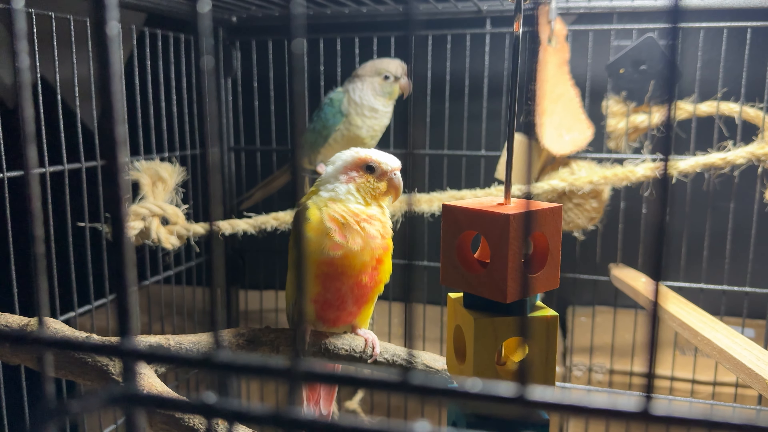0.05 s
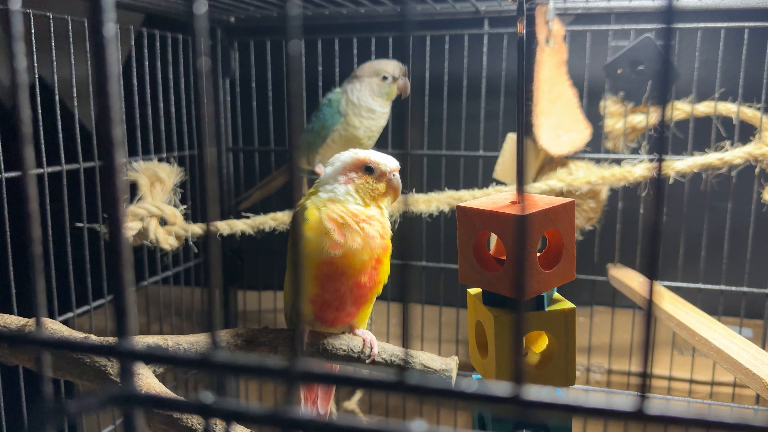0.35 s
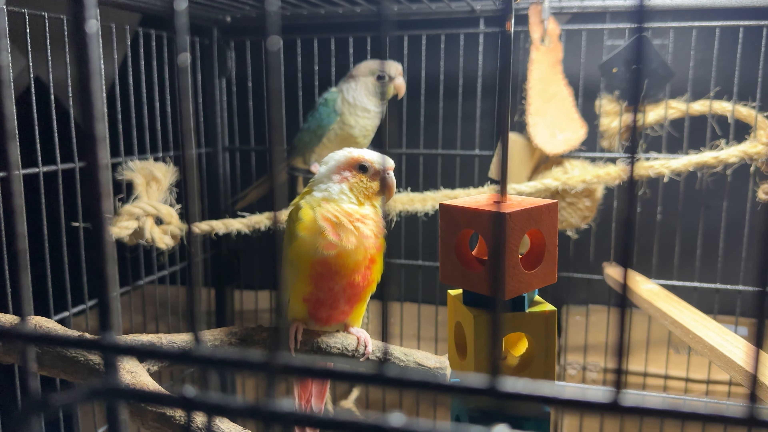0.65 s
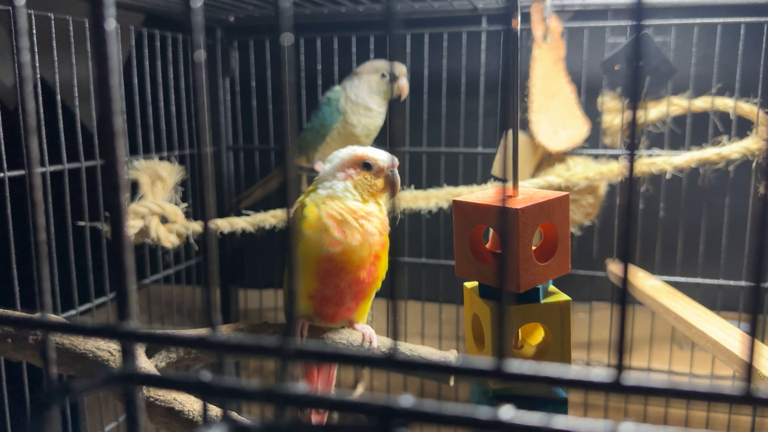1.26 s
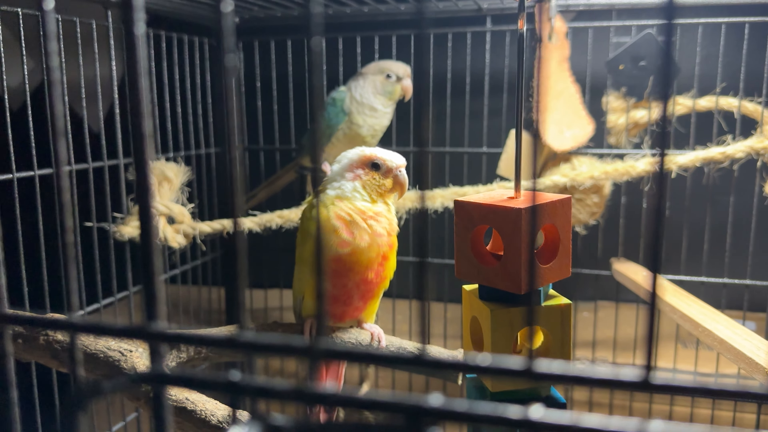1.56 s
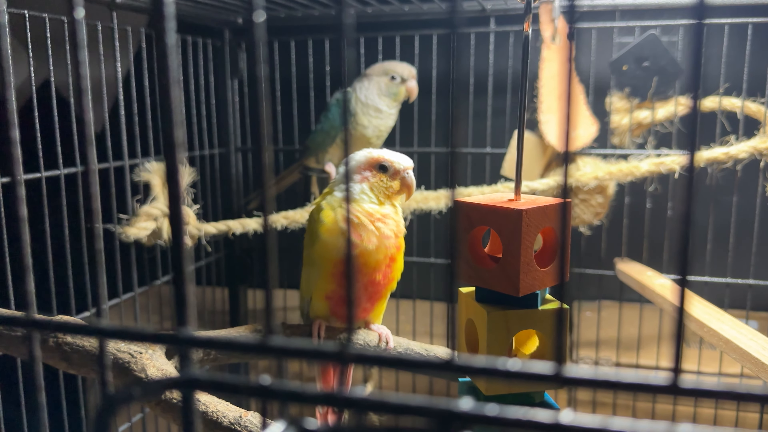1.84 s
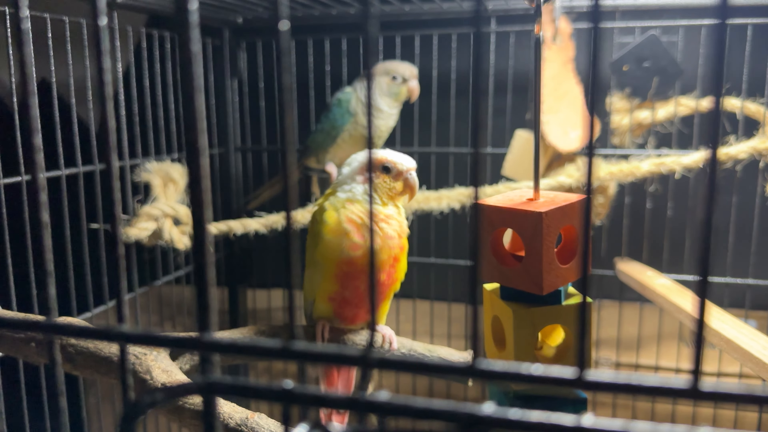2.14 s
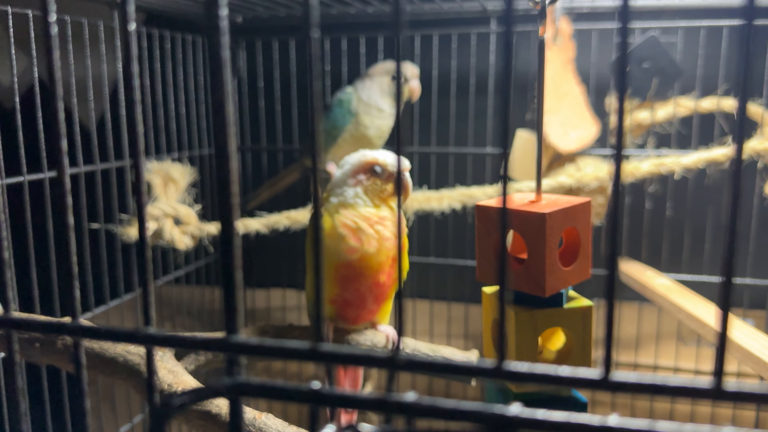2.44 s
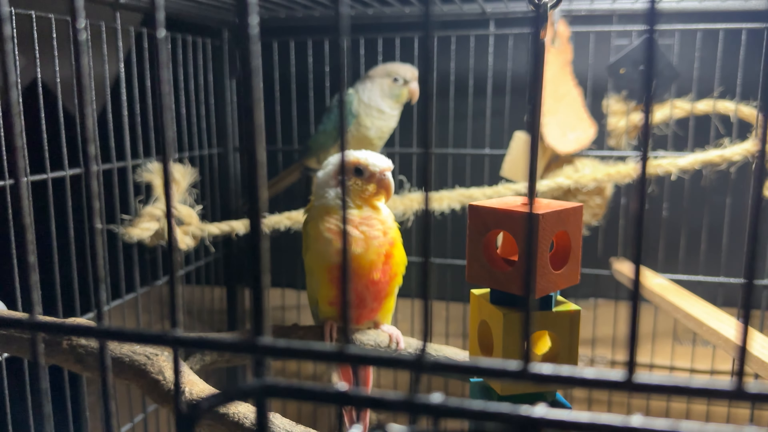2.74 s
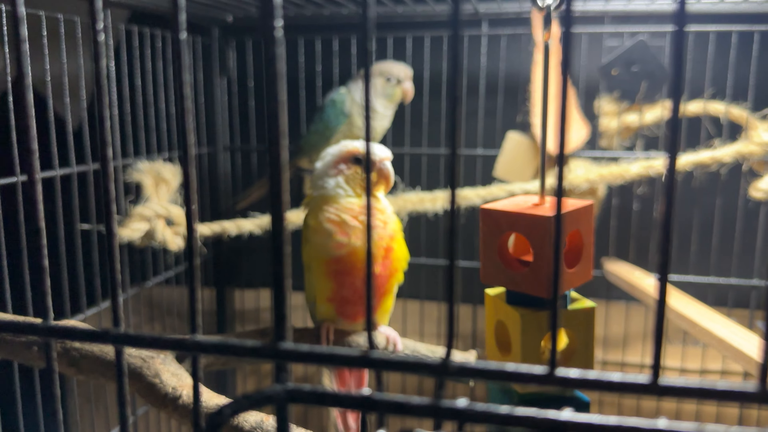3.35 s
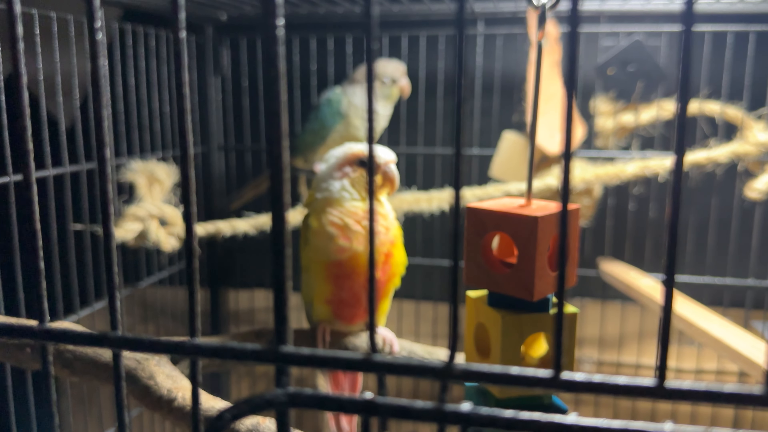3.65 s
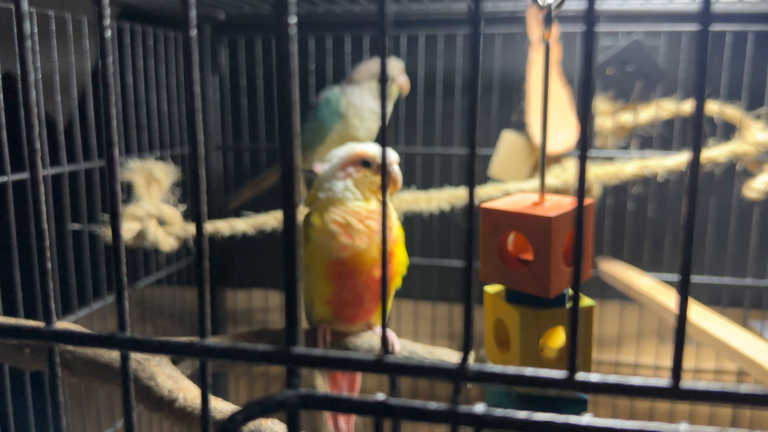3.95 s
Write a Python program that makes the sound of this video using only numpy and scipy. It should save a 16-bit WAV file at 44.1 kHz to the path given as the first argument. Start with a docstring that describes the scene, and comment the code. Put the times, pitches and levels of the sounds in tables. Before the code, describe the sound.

A fan hums in a room, with soft rustling and dull microphone handling bumps.

```python
"""A room with a fan humming, heard from the two microphones of a hand-held camera.
Close by, a soft rustle, likely a sleeve, swells and fades. A finger slides twice on the camera shell
beside the right microphone and catches with a tick at the end of each slide. Dull bumps of the hand
come in among these sounds; after the last and heaviest, a low drone comes up and stays on."""
import sys
import numpy as np
from scipy import signal
from scipy.fft import rfft, irfft
from scipy.io import wavfile
from scipy.ndimage import uniform_filter1d

SR = 44100
rng = np.random.default_rng(int(sys.argv[2]) if len(sys.argv) > 2 else 0)


def output_pcm(signal):
    """Save a mono or channel-first signal as 16-bit PCM at the path in sys.argv[1].

    Samples are clipped to [-1, 1] before scaling.
    """
    pcm = np.clip(np.atleast_2d(signal).T, -1, 1) * 32767
    wavfile.write(sys.argv[1], SR, np.round(pcm).astype(np.int16))


N = 176400
T, HZ = np.arange(N) / SR, np.fft.rfftfreq(N, 1 / SR)


def amp(db):
    """Decibels to gain."""
    return 10 ** (np.asarray(db) / 20)


def unit(x):
    """Scales to rms 1."""
    return x / np.sqrt(np.mean(abs(x) ** 2) + 1e-20)


def spectrum(points):
    """Spreads (Hz, value) points over all frequencies, on a log axis."""
    hz, value = np.transpose(points)
    return np.interp(np.log(HZ + 1), np.log(hz + 1), value)


def level(points):
    """A (seconds, dB) curve as gain per sample."""
    return amp(np.interp(T, *np.transpose(points)))


def colour(x, points):
    """Filters by a (Hz, dB) curve, then scales to rms 1."""
    return unit(irfft(rfft(x) * amp(spectrum(points)), N))


def lowpass(x, hz, order):
    """Keeps what lies below hz."""
    return irfft(rfft(x) / (1 + (HZ / hz) ** order), N)


def drift(rate_hz):
    """Random motion of rms 1, mostly slower than rate_hz."""
    return unit(irfft(rfft(rng.standard_normal(N)) * np.exp(-(HZ / rate_hz) ** 2), N))


def diffuse(lean_db, patchy_db, lag_s):
    """Patchy noise at both microphones: part from all around, part from the right, later on the left."""
    # Likeness of the microphones for sound from all around. Each row: Hz, correlation from -1 to 1.
    likeness = [(60, 0.97), (130, 1), (250, 0.97), (500, -0.28), (950, 0.044), (1700, -0.21),
                (3000, -0.047)]
    # Sound arriving straight from the right. Each row: Hz, share of the power.
    direct_share = [(200, 0), (500, 0.46), (1000, 0.28), (2400, 0.26), (4500, 0.07), (8000, 0.5)]
    same, share = spectrum(likeness), spectrum(direct_share)
    mid, side, source = rfft(rng.standard_normal((3, N)))
    mid, side = mid * np.sqrt((1 + same) / 2), side * np.sqrt((1 - same) / 2)
    around = np.sqrt(1 - share) * np.array([mid + side, mid - side])
    direct = np.sqrt(share) * np.array([source * np.exp(-2j * np.pi * HZ * lag_s), source])
    pair = irfft((around + direct) * amp(lean_db * np.array([[.5], [-.5]])), N)
    frames = signal.stft(pair, nperseg=512, noverlap=384)[2]
    patches = uniform_filter1d(rng.standard_normal(frames.shape[1:]), size=4, axis=0)  # across pitch
    patches = unit(uniform_filter1d(patches, size=40, axis=1))  # across time
    return signal.istft(frames * amp(patchy_db * patches), nperseg=512, noverlap=384)[1][:, :N]


def room(tone_db=-53.5, patchy_db=1.33, lag_s=0.000373):
    """Steady room tone over a low rumble."""
    # Colour of the room tone: a rush of air, with a very faint high hiss on top.
    # Each row: Hz, relative dB.
    tone_colour = [(100, 3.5), (150, -0.5), (195, 2.5), (240, -2), (300, -6), (390, -11.5), (520, -10.5),
                   (680, -13.5), (760, -16), (870, -17), (980, -14.5), (1150, -21.5), (1450, -23),
                   (1800, -25.5), (2300, -32), (2600, -28.5), (2850, -36), (3060, -41.5), (3800, -46.5),
                   (6400, -51.5), (7000, -55), (7700, -56), (8800, -74), (11500, -69), (13500, -77.5),
                   (15500, -68)]
    # Colour of the rumble. Each row: Hz, relative dB.
    rumble_colour = [(15, -33), (28, -12.5), (42, -10), (56, -1.5), (74, 4.5), (90, 0.5), (105, -12.5),
                     (150, -30.5), (300, -69)]
    # Where the room tone sits between the microphones. Each row: Hz, left minus right in dB.
    tone_lean = [(100, 6.5), (180, 3.5), (300, -1.2), (520, -0.5), (690, -1.5), (950, -4.5), (1520, -3),
                 (2610, -.5), (3400, 1.5), (5500, -8.5), (7700, -13.5), (9500, 21)]
    # Swells of the room tone's bass, its upper part and the rumble. Each row: seconds, gain in dB.
    bass_gain = [(0, -1.5), (1.1, 1), (2, 1), (3.2, -0.5), (3.7, 1.5)]
    upper_gain = [(0, -0.068), (1.2, 0.76), (2.3, -0.092), (4, -0.86)]
    rumble_gain = [(0, -52), (1.2, -49), (1.65, -50), (2.25, -50), (2.41, -45.5), (2.5, -60), (2.57, -47.5),
                   (4, -51)]
    tone = colour(diffuse(spectrum(tone_lean), patchy_db, lag_s), tone_colour)
    tone = unit(tone - lowpass(tone, hz=100.7, order=3))
    bass = lowpass(tone, hz=300, order=6)
    tone = bass * level(bass_gain) + (tone - bass) * level(upper_gain)
    rumble = colour(diffuse(0, 0, lag_s), rumble_colour)
    return amp(tone_db) * tone + level(rumble_gain) * rumble


def fan(waver=0.32, lag_s=0.00016, hum_waver_db=1, swell_db=2.14):
    """One motor tone of steady pitch and others that wander and swell, heard later on the left."""
    # The steady tone: pitch in Hz, left level in dB, right level in dB.
    hum_hz, left_db, right_db = (635.2, -65.5, -64.5)
    # The wandering tones. Each row: pitch in Hz, left level in dB, right level in dB, width in Hz.
    tones = [(119, -64, -57, 3.5), (224.6, -65.5, -63.5, 5), (515, -81, -66.5, 10), (563, -79, -76, 10),
             (929, -80.5, -74, 8), (1268, -88.5, -81.5, 11), (2555, -90.5, -93.5, 40),
             (2900, -96.5, -97, 31), (4510, -97.5, -99.5, 70), (6500, -104, -101, 100)]
    arrival = T - np.array([[lag_s], [0]])
    hum = np.cos(2 * np.pi * hum_hz * arrival) * amp(hum_waver_db * drift(rate_hz=2.6))
    out = amp([[left_db], [right_db]]) * unit(hum)
    for hz, left_db, right_db, width in tones:
        turns = hz * arrival + np.cumsum(width / 2 * drift(width)) / SR
        tone = np.cos(2 * np.pi * turns) * (1 + waver * drift(width))
        out += amp([[left_db], [right_db]]) * unit(tone * amp(swell_db * drift(rate_hz=6.7)))
    return out


def sleeve(grain=0.053, patchy_db=2.3, turn_s=0.447, turn_width_s=0.023,
           glide_db=-16.5, glide_width_hz=530, slows_s=0.44, dull_db_per_s=24):
    """Cloth brushes past: a grainy hiss that shifts colour and direction, then dulls as it slows."""
    # Swell and fade of the rustle. Each row: seconds, gain in dB.
    swell = [(0, -63.5), (.25, -63.5), (.35, -62), (.48, -59.5), (.575, -60), (.66, -64), (.75, -70),
             (.9, -83), (1.1, -110)]
    # Where it sits between the microphones. Each row: Hz, left minus right in dB.
    lean = [(1050, -10.5), (1500, -0.5), (1950, -0.5), (3200, 1), (4200, 0), (5000, -4.5), (6100, -6),
            (7300, 1.5), (8200, 0.5)]
    # Its colour at first and once it swells. Each row: Hz, relative dB.
    light_colour = [(350, -18), (700, 0), (1050, 3.5), (1450, -2), (1950, -2), (2450, -8.5), (3100, -3.5),
                    (4000, -10), (4800, -13.5), (6000, -11), (7000, -19), (8000, -19), (9100, -33),
                    (10800, -32), (14000, -36)]
    firm_colour = [(350, -21.5), (700, -5.5), (1050, 6), (1500, 0.5), (2000, -0.5), (2600, -7.5),
                   (3500, -10), (4400, -11.5), (4850, -13), (6000, -10), (7000, -18), (8000, -18),
                   (9100, -33), (10800, -28), (14000, -36)]
    # A broad resonance gliding upward. Each row: seconds, centre in Hz.
    glide_path = [(.3, 3107), (.6, 4430)]
    light = colour(diffuse(spectrum(lean), patchy_db, lag_s=0.000278), light_colour)
    firm = colour(diffuse(spectrum(lean), patchy_db, lag_s=0.00017), firm_colour)
    firmness = (1 + np.tanh((T - turn_s) / turn_width_s)) / 2
    hiss = np.sqrt(1 - firmness) * light + np.sqrt(firmness) * firm
    carrier = np.exp(2j * np.pi * np.cumsum(np.interp(T, *np.transpose(glide_path))) / SR)
    band = np.array([drift(glide_width_hz) + 1j * drift(glide_width_hz) for _ in hiss])
    hiss += amp(glide_db) * (carrier * band).real
    body = lowpass(hiss, hz=3800, order=6)
    treble = (hiss - body) * amp(-dull_db_per_s * np.maximum(T - slows_s, 0))
    return level(swell) * (body + treble) * (1 + grain * drift(rate_hz=680))


def bumps():
    """Handling noise: soft knocks of the hand, each a brief pulse of deep bass in both microphones."""
    # Each row: centre in seconds, peak in dB, pitch in Hz, half length in seconds.
    knocks = [(0.6, -37, 70, 0.022), (0.719, -42.5, 69.4, 0.0065), (0.905, -40, 70.5, 0.021),
              (1.068, -43, 65, 0.0098), (1.681, -35.5, 63.5, 0.014), (1.823, -36, 65, 0.02),
              (2.184, -30.5, 63.8, 0.028), (2.311, -35.5, 58.5, 0.027), (2.665, -27.5, 60, 0.02)]
    out = np.zeros(N)
    for centre, db, hz, half in knocks:
        envelope = amp(db) * np.exp(-((T - centre) / half) ** 2)
        out -= envelope * np.cos(2 * np.pi * hz * (T - centre))
    return out


def through_shell(left, right):
    """A touch on the shell reaches the far, left microphone only weakly."""
    # Loss across the shell. Each row: Hz, gain on the left in dB.
    far_side = [(1000, -8), (1800, -8), (2350, -13.5), (3100, -7), (3700, -9.5), (5200, -26), (7500, -17),
                (9000, -3)]
    return np.array([irfft(rfft(left) * amp(spectrum(far_side)), N), right])


def slides(slips_per_s=5300, slip_spread_db=1, smooth_rub=0.62, unsteady_db=0.6):
    """Dense tiny slips of skin excite the camera shell next to the right microphone."""
    # One loudness curve for each stroke of the finger. Each point: seconds, gain in dB.
    strokes = [
        [(.908, -86), (.935, -59), (.962, -69), (.998, -63.5), (1.03, -78), (1.08, -65), (1.1, -71),
         (1.125, -74), (1.135, -97)],
        [(1.212, -88), (1.235, -63.5), (1.278, -57), (1.325, -62.5), (1.355, -58), (1.374, -67), (1.395, -71),
         (1.425, -91)],
    ]
    # Colour of the shell under the finger. Each row: Hz, relative dB.
    shell = [(500, -3), (1000, 2), (1700, -2), (2280, 8.5), (2600, 2), (3080, -9.5), (3600, -5),
             (4150, -11.5), (4850, -1.5), (5250, -1.5), (6000, 0), (6550, -1), (6950, -10), (7450, -10),
             (8700, -30), (11000, -29), (15000, -39)]
    envelope = sum(level(curve) * (T > curve[0][0]) * (T < curve[-1][0]) for curve in strokes)
    slipping = rng.random((2, N)) < slips_per_s / SR
    slips = slipping * amp(-slip_spread_db * rng.exponential(1, (2, N)))
    rub = colour((slips + smooth_rub) * rng.standard_normal((2, N)), shell)
    return through_shell(*rub) * envelope * amp(unsteady_db * drift(rate_hz=86))


def ticks(rise_s=0.00015, lag_cycles=0.7, left_db=-7):
    """The finger catches and lets go: a tiny snap, treble first, then a short lower ring."""
    # Each row: start in seconds, gain in dB.
    catches = [(1.0885, -38.5), (1.102, -67), (1.125, -61), (1.3828, -39.5), (1.3855, -49), (1.4108, -55)]
    # What a tick rings with. Each row: pitch in Hz, relative dB, seconds to fall by 60 dB.
    modes = [(7500, -4.5, 0.0031), (5730, 2, 0.0026), (3660, 1.5, 0.0017), (2200, 2.5, 0.002),
             (986, 0, 0.0052)]
    t = np.arange(SR // 20) / SR
    out, ring = np.zeros(N), np.zeros(len(t))
    for hz, db, t60 in modes:
        age = np.maximum(t - lag_cycles / hz, 0)
        attack = 1 - np.exp(-(age / rise_s) ** 2)
        ring += amp(db - 60 * age / t60) * attack * np.sin(2 * np.pi * hz * age)
    for start, db in catches:
        out[round(start * SR):][:len(t)] += amp(db) * ring
    out = lowpass(out, hz=8300, order=24)
    return through_shell(amp(left_db) * out, out)


def drone(hz=58.76, waver_hz=0.91, waver_db=0.9):
    """A deep, slightly wavering tone in both microphones, faint until the last bump."""
    # Each row: seconds, gain in dB.
    swell = [(0, -63.5), (2.69, -57.5), (2.73, -39), (2.81, -43.5), (2.92, -45.5), (3.1, -48), (3.3, -45),
             (3.55, -44.5), (3.8, -43), (4, -63)]
    turns = np.cumsum(hz + waver_hz * drift(rate_hz=7.3)) / SR
    return level(swell) * unit(np.sin(2 * np.pi * turns)) * amp(waver_db * drift(rate_hz=4.4))


def scene():
    """All sources at the left and right microphones."""
    return room() + fan() + sleeve() + bumps() + slides() + ticks() + drone()


def record(dry):
    """The recorder passes nothing much above 15.7 kHz."""
    band_limit = signal.firwin(511, 15700, window=("kaiser", 9), fs=SR)
    return signal.oaconvolve(dry, band_limit[None], "same")


dry = scene()
out = record(dry)
output_pcm(out)
```